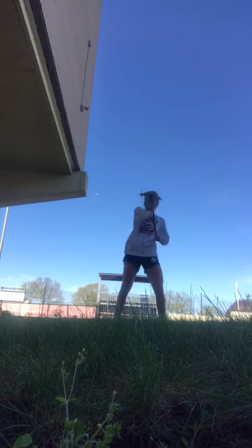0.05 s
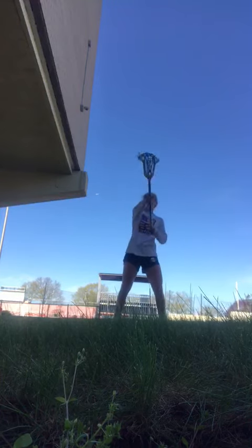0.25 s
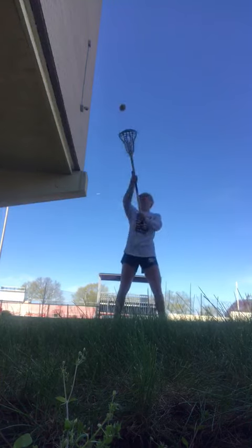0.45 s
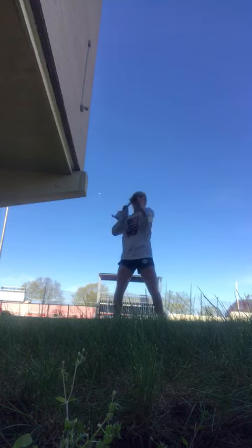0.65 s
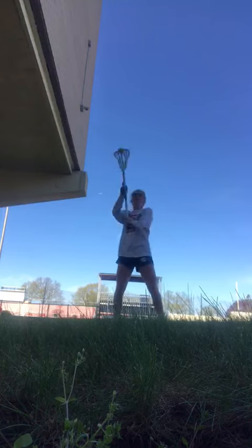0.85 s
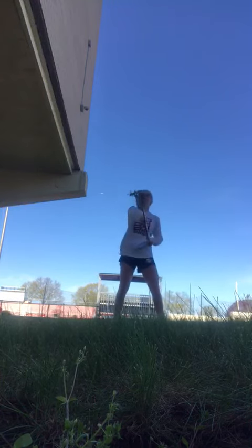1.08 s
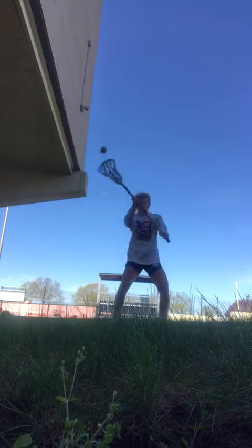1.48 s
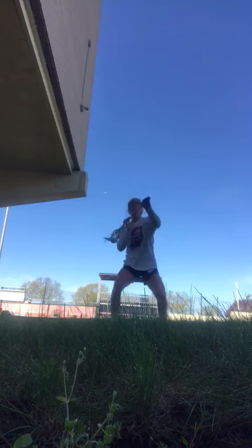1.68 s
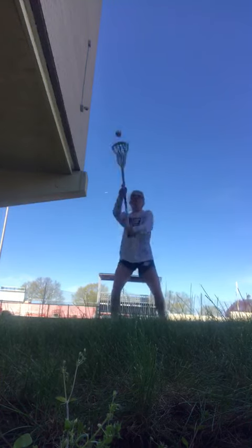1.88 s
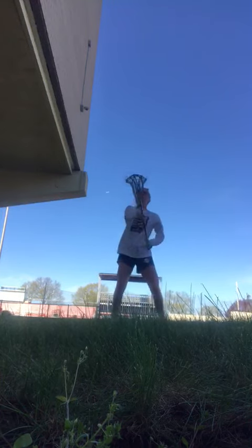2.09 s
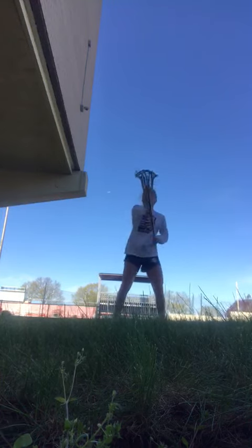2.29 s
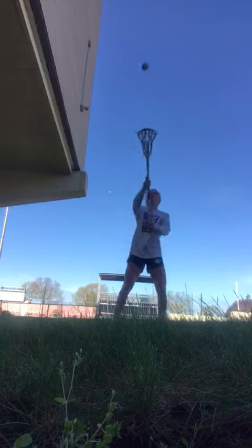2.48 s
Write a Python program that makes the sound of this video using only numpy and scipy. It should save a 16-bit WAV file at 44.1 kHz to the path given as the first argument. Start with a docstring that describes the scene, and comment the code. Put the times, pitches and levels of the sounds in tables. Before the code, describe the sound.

Three loud, booming thuds of a ball hitting an outdoor wall come at an even pace, heard from the wall's foot. Between them a netted stick faintly ticks and swishes, catching and throwing, over a quiet rumble and microphone hiss.

```python
"""A hard rubber ball, thrown with a netted stick, hits an outdoor concrete wall three times, a second
apart, heard from the grass at its foot. Each hit opens with a bending wave in the wall (treble first,
bass last); the crack follows through the air, then short echoes and the wall's low ring. Between hits
the stick ticks, bumps and swishes faintly at catch and throw. Under it all lie a distant rumble,
microphone hiss and a slight electrical ticking."""
import sys
import numpy as np
from scipy import signal
from scipy.fft import rfft, irfft
from scipy.io import wavfile
from scipy.ndimage import uniform_filter1d

SR = 44100
rng = np.random.default_rng(int(sys.argv[2]) if len(sys.argv) > 2 else 0)


def wav_out(sig):
    """Save sig, one row per channel (or a flat mono array), as 16-bit PCM at SR to the path in sys.argv[1]."""
    wavfile.write(sys.argv[1], SR, np.round(np.clip(np.atleast_2d(sig).T, -1, 1) * 32767).astype(np.int16))


N = 116865

# ball on wall, levels relative: t/s, thud/dB, boom f/Hz, boom/dB, knock/dB, crack/dB, snap f/Hz, snap/dB
HITS = [(0.2239, -2.5, 190, 34.5, 26, 1.5, 8400, -22), (1.2610, -3, 157.5, 32.5, 27.5, -.5, 2800, -13),
        (2.2801, -1, 176.8, 33, 27, 0, 4080, -3)]


def wall_thuds():
    """Bending waves outrun the crack and sweep downward, return from the edges and leave a ring."""
    # broad resonances of the wall: f/Hz, width/octaves, relative level/dB
    resonances = [(65.5, 0.38, 30), (655.4, 0.081, 26.5), (898, 0.16, 15), (1380, 0.72, -6.5)]
    # returns from edges and overhang: delay/s, level/dB, dull above f/Hz
    returns = [(0.0238, -8, 420), (.0485, -22, 620), (.0564, -26, 350), (.0691, -14, 269.4),
               (0.103, -17.5, 380), (.168, -26, 169)]
    # colour of the wall's ring: f/Hz, relative level/dB
    ring_colour = [(40, 12), (70, 22), (110, 22), (170, 23.5), (250, 31), (360, 26.5), (480, 14.5),
                   (660, 15.5), (900, 2.5), (1500, -15.5), (3000, -46)]
    lead_s, travel_s = 0.00769, 0.004467  # head start on the crack; travel time at 1 kHz
    f = freqs()
    bending = delay(2 * travel_s * np.sqrt(1000 / f) - lead_s)  # the bass travels slower
    paths = 1 + sum(undb(db) * delay(s) / (1 + (f / hz) ** 4) for s, db, hz in returns)
    body = sum(undb(db) * hump(hz, width) for hz, width, db in resonances) + undb(-21)
    damping = 1 / (1 + (f / 1500) ** 4)
    out = 0
    for s, thud_db, boom_hz, boom_db, knock_db, *_ in HITS:
        # the struck spot sets the pitch of the boom and the strength of the knock
        spot = undb(boom_db) * hump(boom_hz, 0.35) + undb(knock_db) * hump(377.7, 0.24)
        sweep = sharp_pulse(body + spot) * damping * bending * paths * delay(s)
        ring_tone = undb(-7) * (colour(ring_colour) + undb(-8) * spot)
        tail = rng.standard_normal(N) * fade(s, t60=0.29, rise=0.0053)
        ring = ring_tone * flatten(rfft(tail), bins=160)
        # a fast pressure wave through the concrete arrives 5.84 ms before the crack
        forerunner = undb(-39.5) * noise(hump(2600, 0.25)) * fade(s - 0.00584, t60=0.013, rise=0.00042)
        out = out + undb(thud_db) * (irfft(sweep + ring, N) + forerunner)
    return out


def air_cracks():
    """The slap of rubber on concrete, scattered by the grass and echoed by the building."""
    # colour of the airborne crack: f/Hz, relative level/dB
    crack_colour = [(500, -86), (1200, -11.5), (2200, -6), (3500, -9), (5500, -11.5), (8500, -19),
                    (10500, -23.5), (13000, -18.5), (16000, -32)]
    # slapback echoes: delay/s, relative level/dB
    slaps = [(.0175, -22), (.0305, -19), (.039, -36), (.058, -30), (.083, -31), (.099, -31.5)]
    # colour of the echoes: f/Hz, relative level/dB
    echo_colour = [(800, 2), (2000, -1.5), (3500, 0), (5500, -0.5), (8000, -8), (11000, -16), (16000, -22)]
    out = 0
    for s, *_, crack_db, snap_hz, snap_db in HITS:
        tone = colour(crack_colour) + undb(snap_db) * hump(snap_hz, 0.45)
        scatter = rng.standard_normal(N) * fade(s, t60=0.0059)
        scatter *= undb(-0.5) / np.linalg.norm(scatter)  # nearly as much energy as the clean pulse
        crack = irfft(sharp_pulse(tone) * flatten(delay(s) + rfft(scatter), bins=2400), N)
        slapback = sum(undb(db - 27.5) * fade(s + lag, t60=0.013) for lag, db in slaps)
        reverb = undb(-58.5) * fade(s, t60=0.28)
        echoes = (slapback + reverb) * noise(colour(echo_colour))
        out = out + undb(crack_db) * (crack + echoes)
    return out


def netted_stick():
    """The ball ticks against the plastic head and bumps into the pocket; the net swishes as it swings."""
    # ball on the head at catch and throw: t/s, level/dB, f/Hz, t60/s
    head_taps = [(0.631, -62, 4200, 0.034), (.739, -73, 3300, .06), (0.9592, -50, 5400, 0.0099),
                 (0.9647, -54.5, 5340, 0.029), (0.966, -53, 12000, .012), (1.652, -55, 2800, 0.042),
                 (1.665, -65, 4800, .05), (1.755, -62, 4100, 0.015), (1.961, -64.5, 5400, 0.034),
                 (1.972, -60, 4800, 0.021), (2.164, -62, 3800, 0.018)]
    # net sweeping through the air: t/s, half length/s, level/dB
    swings = [(0.735, 0.033, -71.5), (0.96, 0.034, -69.5), (1.04, 0.024, -71.5), (1.662, 0.047, -78)]
    # ball landing softly in the pocket: t/s, level/dB
    landings = [(0.739, -50.5), (1.61, -62), (1.65, -60), (2.16, -52)]
    t = np.arange(N) / SR
    ticks = sum(undb(db) * noise(hump(hz, 0.59)) * fade(s, t60, rise=0.00042)
                for s, db, hz, t60 in head_taps)
    swish_level = sum(undb(db) * np.exp(-((t - s) / half) ** 2) for s, half, db in swings)
    bump_level = sum(undb(db) * fade(s, t60=0.13, rise=0.011) for s, db in landings)
    return ticks + swish_level * noise(hump(2930, 0.49)) + bump_level * noise(hump(457, 1.15))


def distant_rumble():
    """A bed of far traffic and air, gently swelling."""
    # colour of the rumble: f/Hz, relative level/dB
    rumble_colour = [(20, -36), (35, -22), (52, -1), (70, -1), (105, -4), (160, -10), (250, -15),
                     (400, -20), (500, -19.5), (630, -16.5), (720, -23), (810, -36.5), (1000, -34),
                     (1500, -37.5), (2200, -47.5), (3300, -51), (4800, -64), (16000, -57)]
    swell_db = 0.4 * noise(hump(hz=3.07, octaves=1))
    return undb(-42.5 + swell_db) * noise(colour(rumble_colour))


def microphone_noise():
    """Flickering hiss, a faint even electrical ticking and a few stray clicks."""
    # colour of the hiss: f/Hz, relative level/dB
    hiss_colour = [(3000, -5), (6000, 6), (7500, -2.5), (9000, 3.5), (10300, -7.5), (11500, 11), (12500, 7),
                   (13400, 5), (14500, 12), (15600, -3), (16000, -18)]
    tick_gap_s, clicks_per_s = 0.05, 4
    flicker_db = 4.2 * noise(hump(hz=68.6, octaves=0.84))
    hiss = undb(-77 + flicker_db) * noise(colour(hiss_colour))
    ticks = sum(undb(-38 - 0.2 * rng.standard_normal()) * delay(s + rng.uniform(-0.00043, 0.0005))
                for s in np.arange(0.0297, N / SR, tick_gap_s))
    clicks = undb(-46) * rfft(1. * (rng.random(N) < clicks_per_s / SR))
    return hiss + irfft(ticks * hump(8950, 0.16) + clicks * hump(11000, 0.45), N)


def undb(db):
    """Decibels to gain."""
    return 10 ** (np.asarray(db) / 20)


def freqs():
    """Frequency of each spectral bin, at least 1 Hz."""
    return np.maximum(np.arange(N // 2 + 1) * SR / N, 1)


def colour(points):
    """EQ curve through (f/Hz, level/dB) points, as gain per bin."""
    hz, db = np.array(points).T
    return undb(np.interp(np.log(freqs()), np.log(hz), db))


def hump(hz, octaves):
    """Bell curve of one resonance, as gain per bin."""
    return np.exp(-.5 * (np.log2(freqs() / hz) / octaves) ** 2)


def noise(gain):
    """Unit-level noise with the given spectrum."""
    shaped = irfft(rfft(rng.standard_normal(N)) * gain, N)
    return shaped / shaped.std()


def delay(s):
    """Spectrum of a delay of s seconds."""
    return np.exp(-2j * np.pi * freqs() * s)


def sharp_pulse(gain):
    """Spectrum of the most abrupt (minimum-phase) pulse with this colour."""
    cepstrum = irfft(np.log(gain + 1e-6), N)
    cepstrum[1:N // 2] *= 2
    cepstrum[N // 2 + 1:] = 0
    return np.exp(rfft(cepstrum))


def fade(start, t60, rise=.0001):
    """Envelope with a quick attack and an exponential decay; times in seconds."""
    age = np.maximum(np.arange(N) / SR - start, 0)
    return (1 - np.exp(-age / rise)) * np.exp(-np.log(1000) * age / t60)


def flatten(spectrum, bins):
    """Level a scattered pulse to unit gain over stretches of so many bins."""
    return spectrum / np.sqrt(uniform_filter1d(np.abs(spectrum) ** 2, bins))


def scene():
    """All layers mixed at one microphone."""
    return (wall_thuds() + air_cracks() + netted_stick() + distant_rumble() + microphone_noise())[None]


def record(dry):
    """A steep low-pass cuts the top above 16.3 kHz."""
    return signal.sosfilt(signal.ellip(10, .2, 80, 16300, fs=SR, output="sos"), dry)


dry = scene()
out = record(dry)
wav_out(out)
```